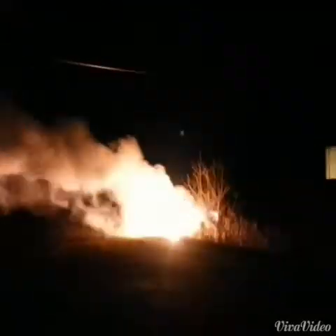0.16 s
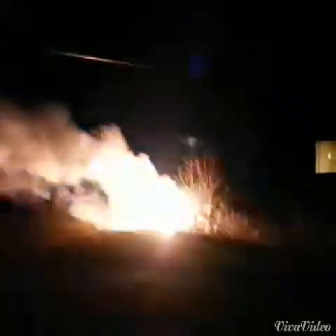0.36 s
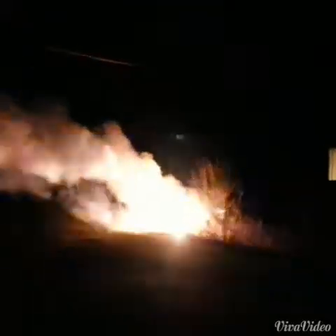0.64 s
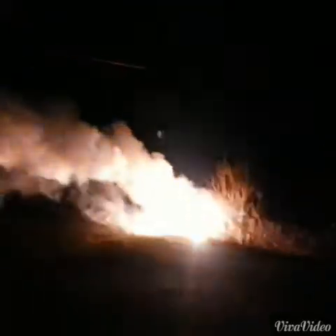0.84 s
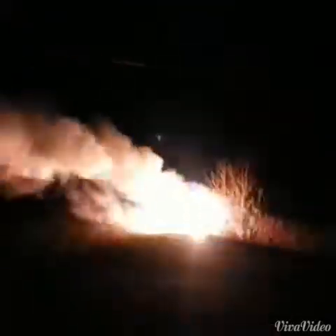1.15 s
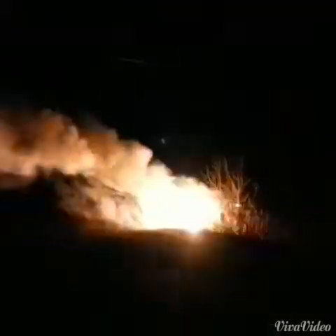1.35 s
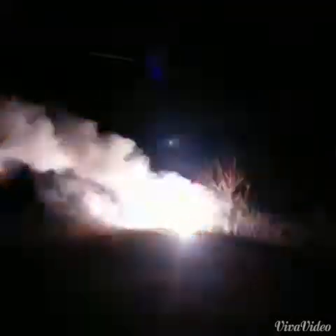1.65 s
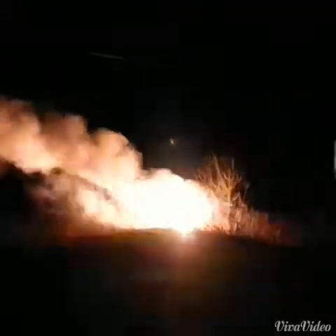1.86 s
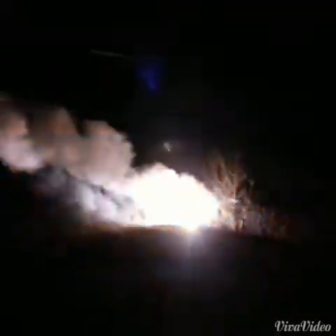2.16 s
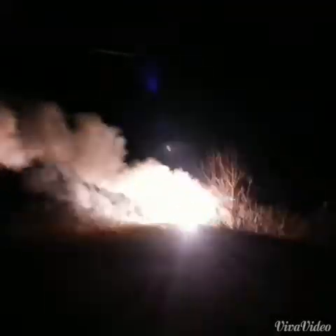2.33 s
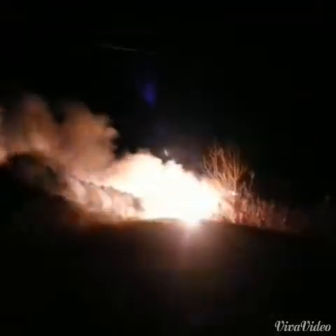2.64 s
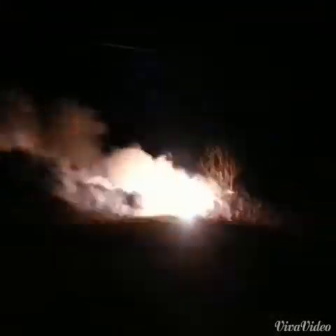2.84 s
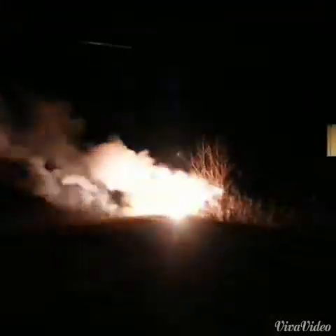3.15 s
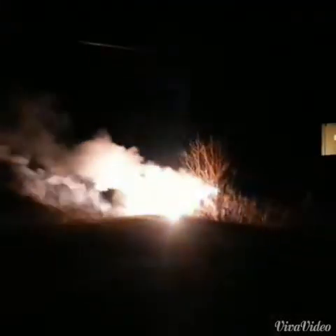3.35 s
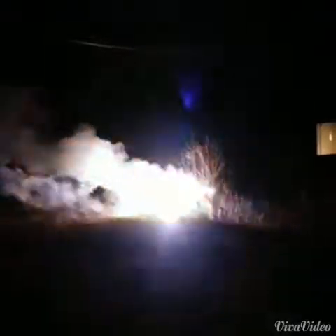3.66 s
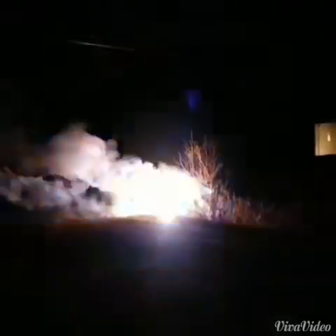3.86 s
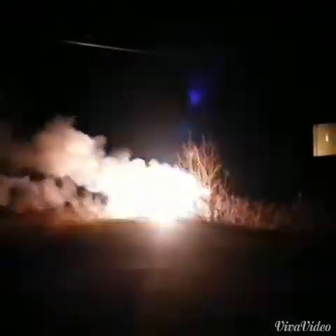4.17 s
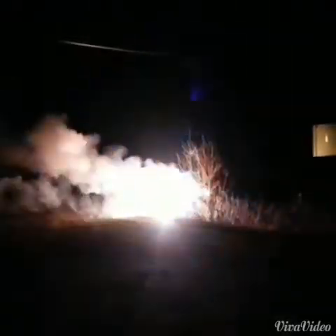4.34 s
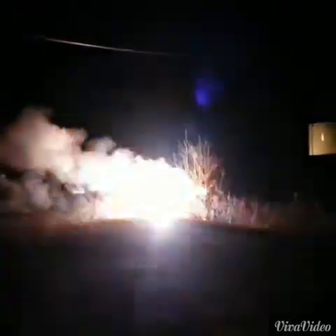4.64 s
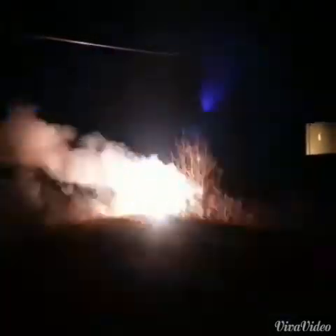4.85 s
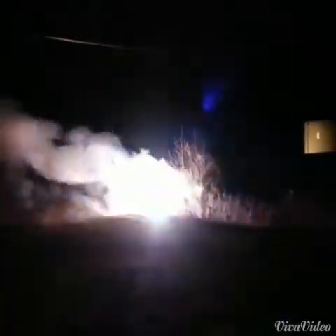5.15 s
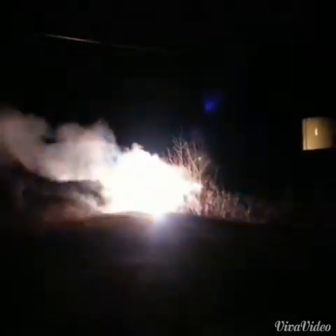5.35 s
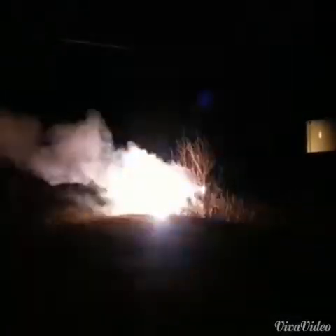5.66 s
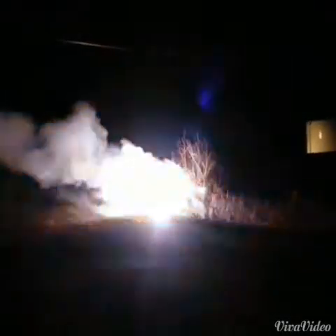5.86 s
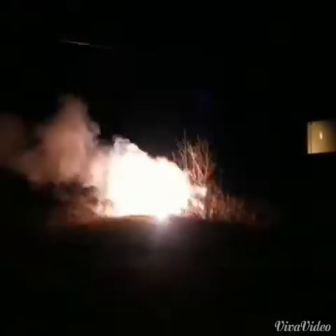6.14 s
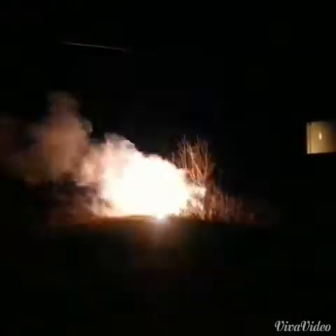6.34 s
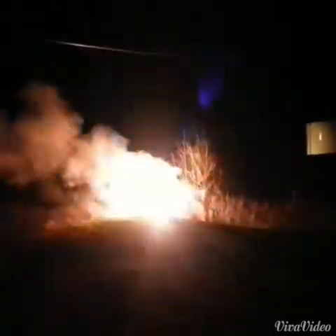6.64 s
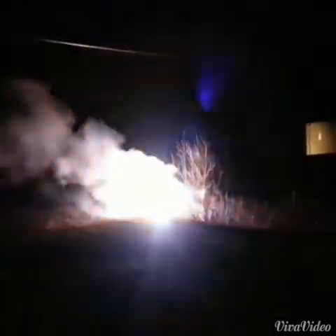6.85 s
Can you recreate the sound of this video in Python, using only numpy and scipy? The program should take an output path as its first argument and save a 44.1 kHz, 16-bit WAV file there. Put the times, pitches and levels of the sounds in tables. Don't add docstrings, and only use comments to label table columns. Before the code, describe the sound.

A continuous low electrical buzz, slightly unsteady, with rapid fizzing and scattered sharp cracks from an arc on the ground. Stones click and grit crunches near the microphone at the start. Loud snaps stand out around one, two and five seconds. Soft night-air hiss lies beneath; wind thumps hit the left side hard after six seconds, while the right stays sheltered.

```python
import sys
import numpy as np
from scipy import signal
from scipy.fft import rfft, irfft
from scipy.io import wavfile
from scipy.ndimage import uniform_filter1d

SR = 44100
rng = np.random.default_rng(int(sys.argv[2]) if len(sys.argv) > 2 else 0)


def natural_amplitude(level_db):
    exponent = np.asarray(level_db, float) / 20
    return 10 ** exponent


def file_out(sig):
    cols = np.atleast_2d(sig).T
    lim = np.clip(cols, -1, 1)
    pcm = np.round(lim * 32767).astype(np.int16)
    wavfile.write(sys.argv[1], SR, pcm)


N = 308700
T = np.arange(N) / SR
SIDE = np.array([[.5], [-.5]])
MAINS_HZ = 59.9945
STRIKE_S = .00480


def evened(x):
    return x / np.sqrt(np.mean(x ** 2, -1, keepdims=True) + 1e-20)


def read(points, hz):
    f, value = np.transpose(points)
    return np.interp(np.log(hz + 1), np.log(f + 1), value)


def curves(rows):
    s, *columns = np.transpose(rows)
    return [np.interp(T, s, c) for c in columns]


def bumps(rows):
    t = T[::64]
    swell = sum(db * np.exp(-((t - s) / half) ** 2) for s, db, half in rows)
    return np.interp(T, t, swell)


def wander(hz, channels=1):
    f = np.fft.rfftfreq(N, 1 / SR)
    spectrum = rfft(rng.standard_normal((channels, N)))
    return evened(irfft(spectrum / (1 + (f / hz) ** 4), N))


def causal(points, size=1024):
    log_gain = np.log(natural_amplitude(read(points, abs(np.fft.fftfreq(size, 1 / SR)))))
    return np.fft.ifft(np.exp(np.conj(signal.hilbert(log_gain)))).real[:size // 2]


# t/s, hum level/dB, 2nd overtone/dB re hum, 3rd overtone/dB re hum
HUM_COURSE = [(0, -27, -15, -18.5), (.45, -23, -17.5, -18.5), (.87, -26, -16.5, -18.5),
              (1.05, -24.5, -11, -15.5), (1.6, -26.5, -14, -11), (2.05, -26.5, -16.5, -17.5),
              (2.6, -26, -16, -14), (3, -25, -14.5, -19), (3.3, -27, -14, -14), (3.7, -25, -11.5, -19.5),
              (4.3, -27, -14.5, -16), (4.8, -26, -12, -15), (5.3, -26.5, -13, -16.5), (5.7, -27, -14, -12),
              (6.1, -26, -13.5, -14.5), (6.55, -22, -11.5, -15.5), (6.85, -23.5, -11.5, -14),
              (7, -23.5, -14, -14)]
# t/s, change/dB, half length/s
STUMBLES = [(.14, -1, 0.033), (.334, -3.5, 0.11), (.609, -3.5, 0.13), (1.796, 0, .02), (1.821, 2, .02),
            (1.936, -2, 0.032), (2.075, -1.5, 0.053), (2.35, -2, 0.034), (2.569, 0.5, 0.033),
            (3.402, -1.5, 0.045), (3.93, -5.5, 0.017), (4.046, 1, .05), (4.34, -2, 0.025),
            (4.505, 0.5, 0.036), (4.994, -3.5, 0.035), (5.078, -1.5, 0.032), (5.228, 3, 0.049),
            (5.413, -0.5, 0.044), (5.557, 2.5, .04), (5.612, -2.5, 0.016), (5.687, 3.5, 0.016),
            (5.812, -3, 0.016), (5.887, -5, 0.013), (6.266, -5, 0.022), (6.38, 5, 0.0088), (6.45, -5, 0.13),
            (6.69, -2.5, 0.06), (6.899, -2, 0.019), (6.959, -2.5, 0.016)]
# t/s, 2nd overtone change/dB, 3rd overtone change/dB, half length/s
ROUNDINGS = [(0.624, 5.5, -2, 0.14), (1.296, -7, -4.5, 0.36), (1.432, -8, -4.5, 0.15),
             (1.82, -11, -3.5, 0.075), (3.069, -12, -10.5, 0.09), (3.166, -17, -3, 0.029),
             (3.417, -7, -4, 0.12), (4.08, -10, -2, 0.076), (5.576, 4, -4, 0.06), (5.718, 1, -11, 0.038),
             (5.926, -3.5, -3.5, 0.092), (6.88, 2, -9, 0.041)]
MULTIPLES = (1, 3, 5, 7, 8, 10, 12, 22, 26)
# level/dB re hum, extra lag/rad
MULTIPLE_LEVELS = [(-34, -0.5), (-24, 0.46), (-30.5, 0.4), (-44, 1), (-30.5, 1.26), (-31, 2.8), (-48, -2),
                   (-49, -1.2), (-43, 1.4)]
# f/Hz, level/dB
HUM_LEFT = [(120, 0.95), (360, 2), (600, 2.5), (1560, 7.5)]


def hum():
    hum_db, second_db, third_db = curves(HUM_COURSE)
    stumble_db = bumps(STUMBLES)
    hum_db = hum_db + stumble_db - .6
    ridden_out_db = 0.088 * stumble_db
    second_db = second_db - ridden_out_db + bumps([(s, db, half) for s, db, _, half in ROUNDINGS])
    third_db = third_db - ridden_out_db + bumps([(s, db, half) for s, _, db, half in ROUNDINGS])
    orders = [(0, 0, .07), (second_db, 0.1, .2), (third_db, -.1, .2)]
    orders += [(*row, .15) for row in MULTIPLE_LEVELS]
    shakes = wander(35.0, channels=6)
    mains_phase = 2 * np.pi * MAINS_HZ * (T - STRIKE_S)
    out = np.zeros((2, N))
    for i, (k, (db, lag, flutter)) in enumerate(zip((2, 4, 6) + MULTIPLES, orders)):
        left_db = read(HUM_LEFT, k * MAINS_HZ) * np.array([[1], [0]])
        height = natural_amplitude(db + left_db) * (1 + flutter * shakes[i % 6])
        phase = k * mains_phase + lag + .3 * SIDE + flutter * shakes[(i + 3) % 6]
        out -= height * np.cos(phase)
    return np.sqrt(2) * natural_amplitude(hum_db) * out


# t/s, spark density/dB
SPARK_COURSE = [(0, -51.5), (.3, -53), (.9, -55.5), (1.15, -53), (1.45, -54.5), (1.8, -51), (2.1, -54),
                (2.5, -58), (2.8, -54), (3.01, -48), (3.28, -54), (3.9, -54), (4.5, -51.5), (4.9, -51.5),
                (5.25, -56), (5.6, -65), (6.45, -60.5), (7, -53.5)]
# t/s, change/dB, half length/s
FLARES = [(0, 4.5, 0.02), (.09, 1.5, 0.04), (.42, 3.5, 0.075), (.7, -4, 0.055), (1.53, 3.5, 0.035),
          (2.19, 5, 0.052), (3.36, 3, 0.027), (3.67, 0, 0.055), (3.8, -11, .05), (3.87, 5.5, 0.036),
          (4.11, 2.5, 0.02), (4.21, -8.5, 0.05), (4.36, -10, 0.025), (4.67, -8, 0.019), (5.28, 15, 0.0077),
          (5.42, 9, 0.059), (5.51, -2, 0.025), (5.59, 3, 0.02), (5.7, 8, 0.03), (6.09, 6.5, 0.16),
          (6.27, -11, 0.029), (6.37, 3, 0.031), (6.77, 8, 0.13)]


def sparking():
    return curves(SPARK_COURSE)[0] + bumps(FLARES)


# f/Hz, level/dB
PORTS = [
    [(100, 1), (500, -10), (900, -11.5), (2000, -3), (3000, -12.5), (3900, -23), (5100, -8), (6400, -11), (8600, -23), (12500, -11.5), (14500, -13)],
    [(100, -7), (500, -6), (900, -23), (2100, -8.5), (3100, -13.5), (4200, -18.5), (6300, -11.5), (7600, -13), (10300, -29), (13000, -7), (14500, -36)],
]
TREBLE_LAGS = (17, 9)


def ports(dull, bright):
    low = signal.sosfilt(signal.butter(3, 3400, "low", fs=SR, output="sos"), dull)
    high = signal.sosfilt(signal.butter(3, 4400, "high", fs=SR, output="sos"), bright)
    late = np.array([np.roll(h, lag) for h, lag in zip(high, TREBLE_LAGS)])
    responses = np.array([causal(p) for p in PORTS])
    return signal.oaconvolve(low + late, responses, axes=1)[:, :N]


def yard(x, wet_db, t60):
    t = np.arange(6000) / SR
    scattered = rng.standard_normal((2, len(t))) * (rng.random((2, len(t))) < .1)
    tail = scattered * natural_amplitude(-60 * t / t60) * (t > .0015)
    tail /= np.linalg.norm(tail, axis=1, keepdims=True)
    return x + natural_amplitude(wet_db) * signal.oaconvolve(x, tail, axes=1)[:, :N]


def fizz():
    halves = 2 * MAINS_HZ * (T - STRIKE_S) + 1.448
    whole = halves.astype(int)
    chance_db = np.minimum(3.5 * rng.standard_normal(whole[-1] + 1), 4.5)
    size_db = chance_db[whole] + 2.5 * (whole % 2 - 1)
    gate = .16 + natural_amplitude(size_db) * np.sin(np.pi * halves) ** 6
    sparks = rng.standard_normal((3, N)) * natural_amplitude(4.6 * wander(1600))
    sparks = gate * (0.72 * sparks[0] + 0.66 * sparks[1:])
    heard = signal.lfilter(*signal.butter(3, 7500, fs=SR), ports(natural_amplitude(-5.0) * sparks, sparks))
    sound = yard(heard, wet_db=-9, t60=.05)
    return natural_amplitude(sparking() + 2.5) * sound / sound.std()


# f/Hz, level/dB
AIR = [
    [(30, -59), (100, -54), (300, -51), (700, -59), (2000, -60.5), (3700, -75), (5500, -72.5), (8500, -82.5), (12500, -83), (14800, -83)],
    [(30, -67), (100, -64), (300, -56), (700, -62), (2000, -71), (4500, -78.5), (6400, -73), (8500, -82), (12500, -83.5), (14800, -87)],
]
# f/Hz, likeness/0..1
SAME = [(60, 0.78), (130, 0.73), (300, 0.92), (640, 0.08), (1400, 0.011)]
# t/s, roar change/dB, half length/s
RUSTLES = [
    (0, 5, 0.014),
    (.12, 3, 0.14),
    (.41, -0.5, 0.065),
    (.7, 7.5, 0.045),
    (.85, 3, 0.65),
]
# f/Hz, level/dB
WHINE = [(3600, -67.5), (3720, -66)]


def air():
    frames, hz = N // 256 + 5, np.fft.rfftfreq(1024, 1 / SR)
    a, b, c, d, patches = rng.standard_normal((frames, 513, 5)).T
    patches = uniform_filter1d(uniform_filter1d(patches, 12, 0), 10, 1)
    same = np.clip(read(SAME, hz), 0, 1)[:, None]
    left = a + 1j * b
    right = same * left + np.sqrt(1 - same ** 2) * (c + 1j * d)

    def per_frame(v):
        return np.pad(v[::256], (0, frames), "edge")[:frames]

    busy_db = per_frame(sparking() + 64.5)
    rustle_db = per_frame(bumps(RUSTLES))
    roar_db = -1 - 0.061 * busy_db + rustle_db
    hiss_db = .24 * busy_db + 0.94 * rustle_db
    hiss_db = hiss_db + 1.67 * evened(uniform_filter1d(rng.standard_normal(frames), size=6))
    low, high = (np.clip(np.log2((hz[:, None] + 1) / edge_hz), 0, 1) for edge_hz in (450, 3000))
    swell_db = (low - high) * roar_db + high * hiss_db
    colour_db = np.array([read(p, hz) for p in AIR])[:, :, None]
    z = np.array([left, right]) * natural_amplitude(colour_db + swell_db + 1.6 * patches / patches.std())
    out = signal.istft(z, nperseg=1024, noverlap=768)[1][:, :N]
    whine = sum(natural_amplitude(db) * np.sin(2 * np.pi * f * T) for f, db in WHINE)
    out[1] += whine * (1 + .5 * wander(24)[0])
    return out


# t/s, peak level/dB, brightness/dB, left over right/dB
SNAPS = [(0.0714, -22.5, 4, 4), (0.1083, -32, 16, -13), (0.2098, -27.5, 9, -5.5), (0.296, -31.5, -13, 1),
         (0.5602, -30, 11, -8), (0.6515, -39, -18.5, 10), (1.0783, -15, -2, 3.5), (1.136, -21, 0, 4),
         (1.7601, -19.5, -2.5, 5), (2.278, -12, 2, 3), (2.2873, -27, 9, 1), (2.3365, -23.5, 3, 6.0),
         (2.5804, -34.5, 5, -7), (2.9027, -32, -3, 11), (2.9369, -20.5, -5, 5), (3.0186, -22, 7, 4),
         (3.336, -33, -7, 12), (3.7371, -23.5, -7, 5), (4.087, -34, 20, 7), (4.3104, -27, -5, 7),
         (4.953, -10.5, 4.5, 1.5), (5.2788, -32, 16, 14), (5.2894, -22, 9, 7), (5.402, -15, 3, 2.5),
         (5.4379, -26, 1, -1), (5.8614, -20, 3.5, 5.5), (6.2203, -37, -13, 5), (6.721, -33.5, 21, 2),
         (6.853, -34.5, -11, 10), (6.945, -24.5, -6, 10.5)]
# t/s, peak level/dB
TICKS = [(0.7125, -23), (5.136, -35), (5.5952, -31.5), (5.688, -34), (6.378, -29), (6.6288, -27),
         (.1655, -37), (.263, -32), (0.8007, -25), (1.279, -33), (1.8791, -31), (2.386, -31),
         (3.902, -30.5), (5.238, -37), (5.304, -33)]
# t/s, peak level/dB, left over right/dB
SPITS = [(0.0547, -37, -3.0), (1.2495, -33, 0.5), (1.5438, -40, -3), (1.6356, -41, 2.5), (2.1709, -37, 6),
         (2.1864, -34, 6), (2.703, -38, 3), (2.788, -43, 7), (2.986, -32, 9), (3.0539, -41, -5),
         (3.0783, -37, 1.5), (3.4205, -39, 4), (3.5702, -43, 2), (3.6036, -41, 2.0), (3.6198, -31.5, 2.5),
         (3.6705, -35, 5.0), (3.9368, -44, 0.5), (3.9528, -37, 7), (4.0042, -38, 6), (4.0207, -36, 13),
         (4.12, -35, 10), (4.2448, -36, 3.0), (4.3858, -37, 1.0), (4.4724, -39, 9), (4.4866, -31.5, 3.0),
         (4.57, -36, 2.5), (4.6036, -34, 9), (4.7226, -37, 9), (4.786, -53, -1), (4.8216, -36, 3.0),
         (4.8627, -31.5, 2.5), (4.9201, -38, 6), (5.007, -38, 3.5), (5.3862, -41, 6), (6.8118, -36, 1)]


def snaps():
    small_db = 3.5 * np.minimum(rng.exponential(1, N), 1.2) - 38
    small = natural_amplitude(small_db) * (rng.random(N) < 60 / SR)
    dull = -small * np.ones((2, 1))
    bright = dull.copy()
    ticks = [(s, db, -2.5, 8) for s, db in TICKS]
    spits = [(s, db, 20, pan_db) for s, db, pan_db in SPITS]
    for s, db, bright_db, pan_db in SNAPS + ticks + spits:
        at = round(s * SR) + 49
        height = natural_amplitude(db + 23.5 + (pan_db - 2.5) * SIDE[:, 0])
        dull[:, at] -= height * natural_amplitude(-bright_db / 2)
        bright[:, at] -= height * natural_amplitude(bright_db / 2)
    soft_hz = 8500
    sharp = ports(dull, bright)
    direct = signal.lfilter(*signal.butter(3, soft_hz, fs=SR), sharp) + 0.15 * sharp
    echo = yard(direct, wet_db=-8, t60=0.05) - direct
    return direct + signal.lfilter(*signal.butter(1, (3000, soft_hz), "band", fs=SR), echo)


# t/s, length/s, level/dB, ring f/Hz, left over right/dB
SCUFFS = [(0.079, 0.065, -50.5, 1350, 11), (0.412, 0.012, -41.5, 6360, -5), (0.407, 0.015, -49, 12000, -1),
          (0.416, 0.022, -47.5, 2820, 0), (0.432, 0.018, -49, 5200, -10), (0.467, 0.031, -54, 6200, -10),
          (0.47, 0.019, -52, 12000, -3), (0.631, 0.12, -43, 566, 3), (0.653, 0.057, -53, 6150, -12),
          (0.66, 0.049, -46.5, 3450, -2), (0.662, 0.03, -64, 9500, -3), (0.67, 0.028, -37.5, 1400, 3),
          (0.702, 0.011, -48, 5000, -7), (0.706, 0.018, -39.5, 1800, 6), (0.714, 0.014, -55, 3370, 0),
          (0.719, 0.01, -57, 4500, -2), (0.763, 0.17, -50.5, 1530, 5), (0.584, 0.05, -53, 900, 5),
          (2.948, 0.12, -41.5, 293, 4)]
# t/s, t60/s, peak level/dB, ring f/Hz, left over right/dB
STONES = [(.1095, .007, -21, 1500, 0), (.4276, .005, -16, 6300, -7), (.4309, .006, -20, 6400, -6),
          (.4716, .005, -21, 6600, -3), (.6908, .006, -27, 4400, 5), (.4825, .007, -27, 6300, -3),
          (.6842, .006, -25, 1500, 4), (.6876, .006, -25, 1700, 4), (.7185, .006, -27, 1900, 5),
          (.4278, .003, -29, 3000, -3), (.431, .004, -28, 2600, -3), (.4716, .003, -30, 3200, -3),
          (.5615, .006, -26, 6300, -4), (.581, .006, -33, 6000, -3), (.506, .007, -33, 6000, 0),
          (.522, .007, -33, 5200, 0), (.5955, .005, -31, 900, 4), (.708, .006, -28, 3600, 3),
          (.7205, .005, -30, 4200, 3)]


def scuffs():
    out = np.zeros((2, N))
    grit = rng.standard_normal((3, N)) * natural_amplitude(3 * wander(300))
    grit = .5 * grit[0] + 0.14 * grit[1:]
    for s, length, db, hz, pan_db in SCUFFS:
        u, at = np.arange(0, 1, 1 / (length * SR)), round(s * SR)
        shower = np.sin(np.pi * u ** 0.62) * evened(grit[:, at:at + len(u)])
        shower = np.pad(shower, ((0, 0), (0, 100)))
        peak = signal.iirpeak(hz, 1.1, fs=SR)
        ring = evened(signal.lfilter(*peak, signal.lfilter(*peak, shower))) + 0.03 * shower
        out[:, at:at + ring.shape[1]] += natural_amplitude(db + pan_db * SIDE) * ring
    t = np.arange(600) / SR
    for s, t60, db, hz, pan_db in STONES:
        ring = np.sin(2 * np.pi * hz * t) + .1 * rng.standard_normal((2, len(t)))
        ring *= np.minimum(t / .0003, 1)
        out[:, round(s * SR):][:, :len(t)] += natural_amplitude(db + pan_db * SIDE - 60 * t / t60) * ring
    return yard(out, wet_db=-39.0, t60=0.036)


# f/Hz, level/dB
BUFFET = [(20, -12), (43, -6), (65, 2.5), (86, 4), (130, 3), (180, -3), (260, -5), (350, -18), (520, -17),
          (700, -38), (1000, -57), (2000, -52)]
# start t/s, length/s, level at the left port/dB
GUSTS = [(0.936, 0.17, -24), (1.098, 0.26, -35), (1.477, 0.33, -31.5), (1.78, 0.019, -26), (1.88, .04, -41),
         (2.094, 0.48, -30), (2.597, 0.095, -37), (2.845, 0.66, -34), (3.794, 0.094, -35),
         (4.298, 0.2, -38), (4.753, 0.3, -32), (5.574, 0.29, -27), (6.076, 1, -24)]
# t/s, peak level/dB, half width/s
THUMPS = [(0.936, -16, 0.00087), (0.9966, -15.5, 0.0011), (1.0346, -16.5, 0.00054), (1.043, -17, 0.00082),
          (5.7154, -12, 0.0012), (6.0705, -10, 0.001), (6.0785, 0, 0.00084), (6.114, -15, 0.0011),
          (6.1362, -12, 0.00062), (6.144, -14, 0.0013), (6.168, -8, 0.001), (6.1872, -7, 0.00087),
          (6.2225, -24, 0.001), (6.302, -7.5, 0.00084), (6.383, -18, 0.00053), (6.399, -11, 0.0012),
          (6.4531, -14, 0.00082), (6.4826, -10, 0.00094), (6.8088, -12.5, 0.00089), (6.952, -1.5, 0.00077),
          (6.9586, -5, 0.00078), (6.9681, -1, 0.00078), (6.98, -14, 0.0016), (6.9992, -6, 0.00092)]


def wind():
    lumps = rng.standard_normal((2, N)) * natural_amplitude(6.1 * wander(29, channels=2))
    blow = evened(signal.oaconvolve(lumps, causal(BUFFET, size=8192)[None], axes=1)[:, :N])
    strength = natural_amplitude(-91) * np.clip(T / 1.7, 0, 1)
    rise_s, fall_s = 0.016, 0.032
    for s, length, db in GUSTS:
        before, after = (s - T) / rise_s, (T - s - length) / fall_s
        strength += natural_amplitude(db) * np.exp(-np.maximum(before, np.maximum(after, 0)))
    blow *= strength * natural_amplitude(np.array([[-2.5], [-13]]))
    for s, db, half in THUMPS:
        near = slice(round((s - .02) * SR), round((s + .02) * SR))
        u = (T[near] - s) / half
        u = u * (1 - 0.24 * np.tanh(u))
        suck = np.exp(-.55 * abs(u) ** 2.0)
        rebound = 0.32 * np.exp(-.15 * (u - 3.5) ** 2)
        onset = 0.52 * np.exp(-.15 * (u + 3.6) ** 2)
        blow[0, near] -= natural_amplitude(db) * (suck - rebound - onset)
    return signal.lfilter(*signal.butter(1, 60, "high", fs=SR), blow)


def scene():
    return hum() + fizz() + air() + snaps() + scuffs() + wind()


def band_limit(x):
    return signal.sosfilt(signal.butter(12, 15430, fs=SR, output="sos"), x)


# f/Hz, threshold/dB re the usual level there
GATE = [(700, -40), (2000, -12), (3500, -5), (5500, -10), (8500, -4), (10200, -2.5), (12000, -4),
        (13500, -1.5), (14300, 1.5), (14800, 12)]


def record(dry):
    hz, t, z = signal.stft(dry, SR, "cosine", 2048, 1024)
    usual = uniform_filter1d(np.median(abs(z), axis=2, keepdims=True), size=15, axis=1)
    loudness = uniform_filter1d(uniform_filter1d(abs(z) / usual, size=151, axis=1), size=9, axis=2)
    usual = usual * np.minimum(loudness, 1.1)
    drift = evened(uniform_filter1d(rng.standard_normal((2, 1, len(t))), size=3))
    drift_db = drift * np.clip(hz / 6600, 0, 3)[:, None]
    near = uniform_filter1d(uniform_filter1d(abs(z), size=5, axis=1), size=2, axis=2)
    kept = near > usual * natural_amplitude(read(GATE, hz)[:, None] + drift_db)
    z = z * kept * (hz < 15300)[:, None]
    mix = signal.istft(z, SR, "cosine", 2048, 1024)[1][:, :N]
    return band_limit(mix)


dry = scene()
out = record(dry)
file_out(out)
```